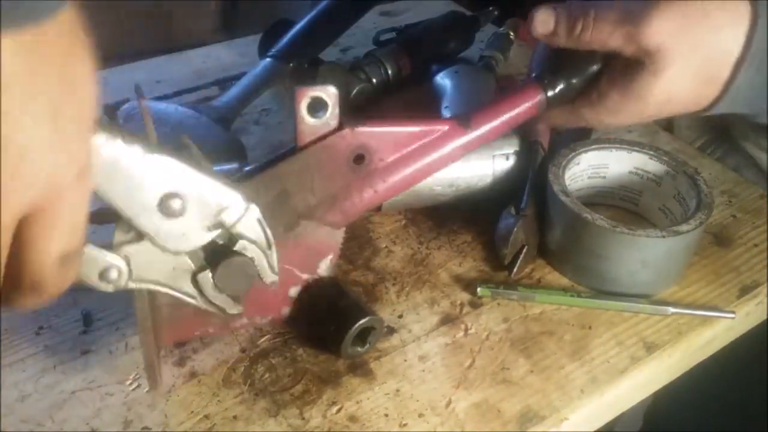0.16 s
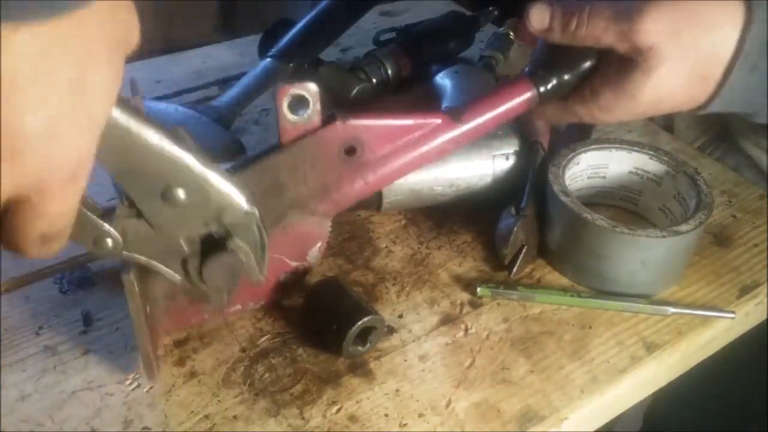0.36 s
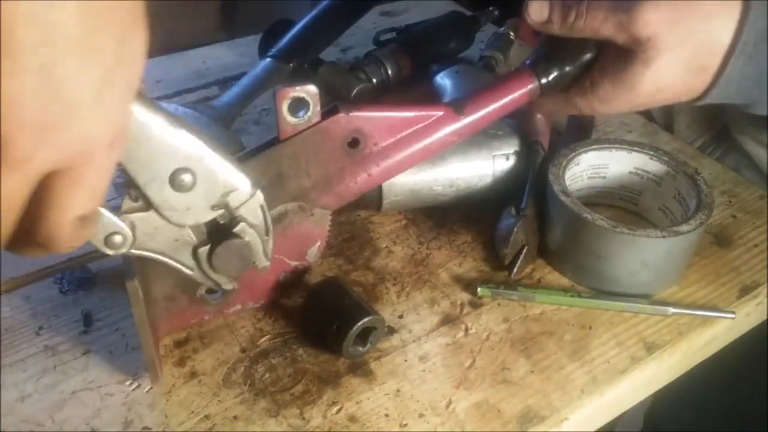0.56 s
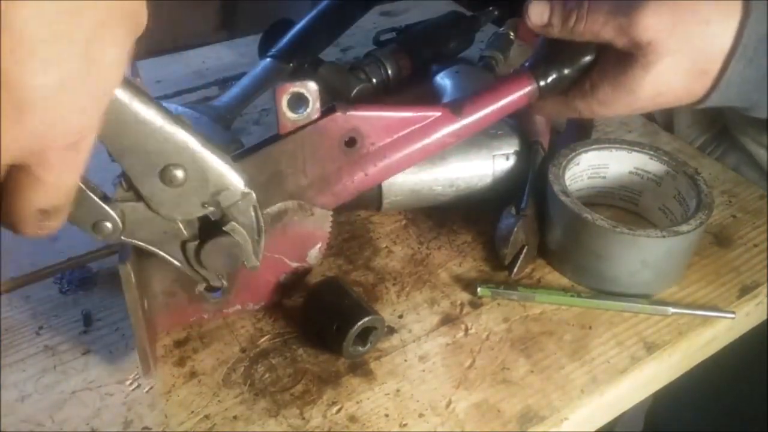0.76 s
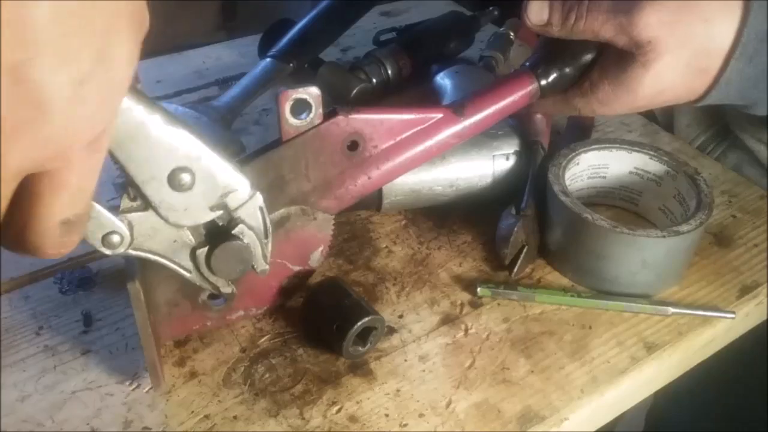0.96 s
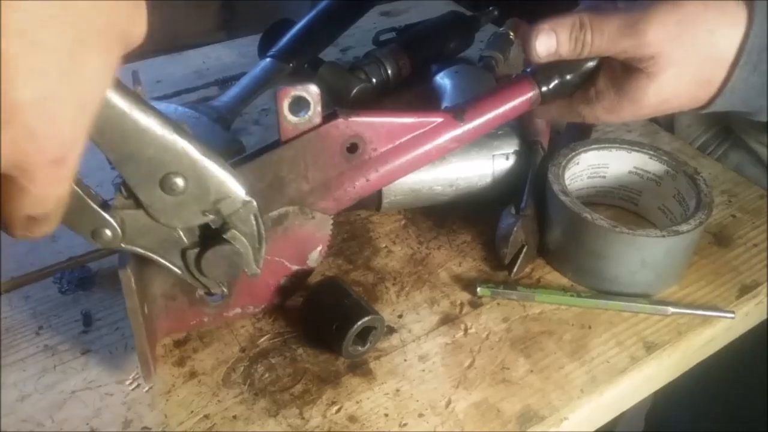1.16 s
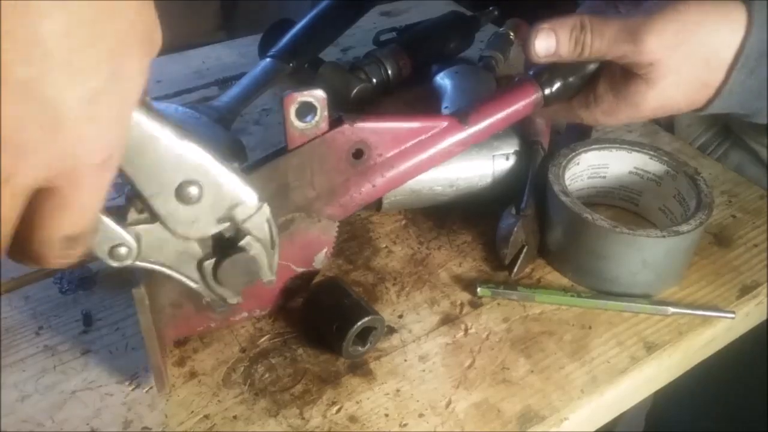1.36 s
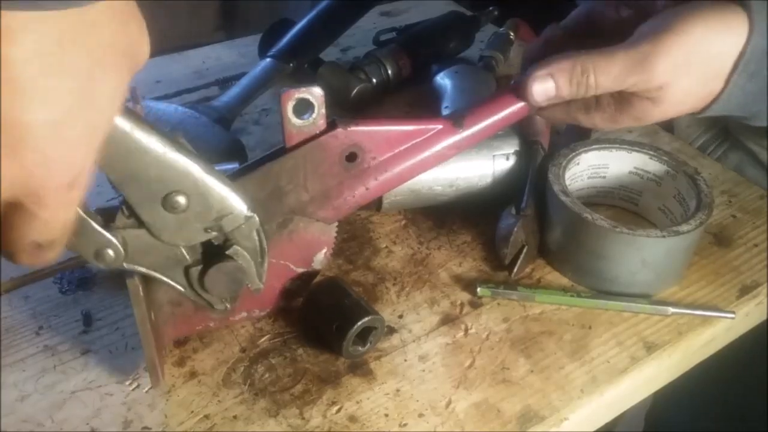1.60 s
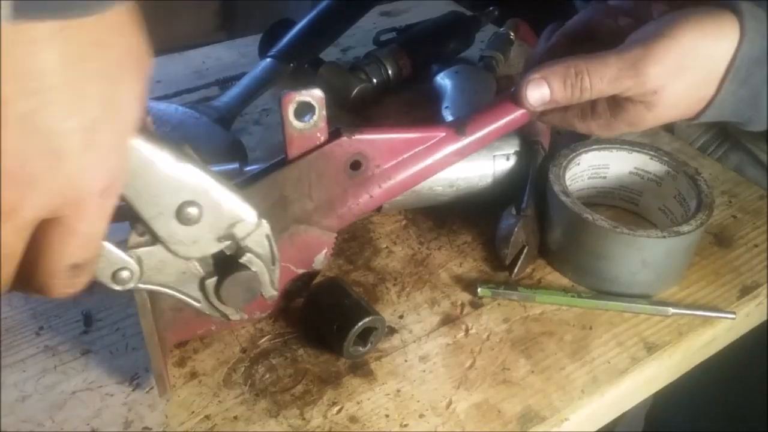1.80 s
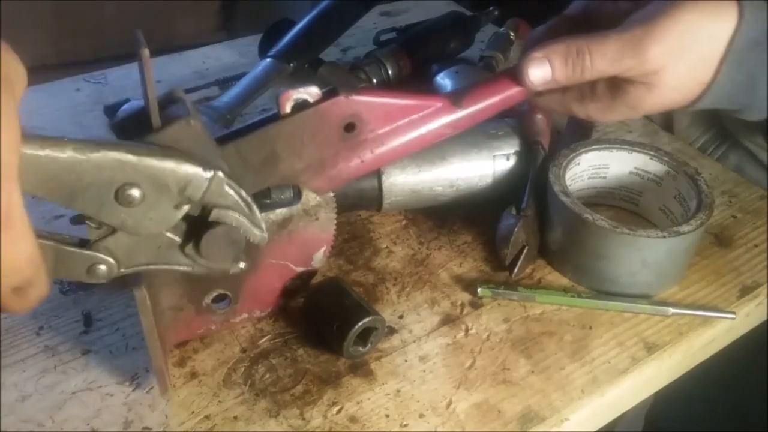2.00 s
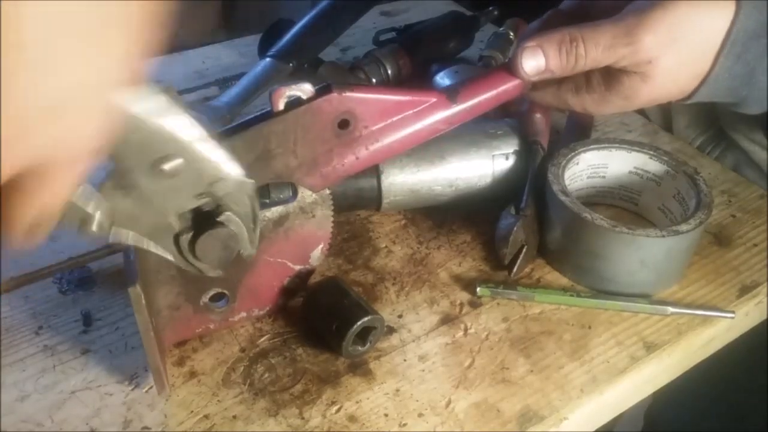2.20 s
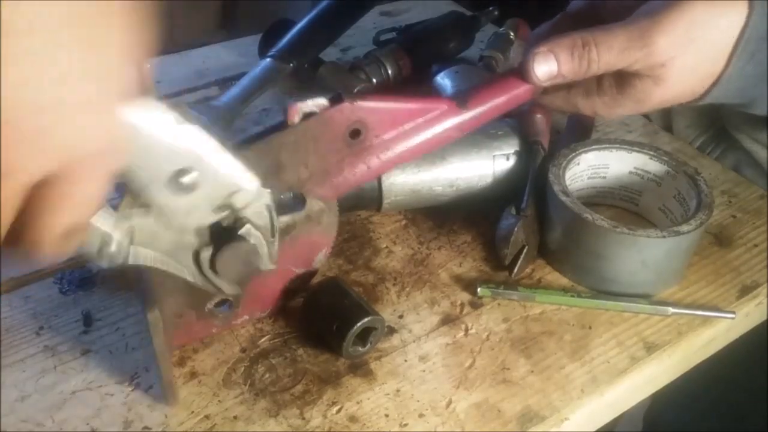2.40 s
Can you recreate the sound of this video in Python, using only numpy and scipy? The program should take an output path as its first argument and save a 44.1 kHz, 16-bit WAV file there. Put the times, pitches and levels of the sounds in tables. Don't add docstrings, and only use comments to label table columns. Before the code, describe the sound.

Metal pliers clank and scrape as they twist a stuck rusty part on a wooden workbench

```python
import sys
import numpy as np
from scipy import signal
from scipy.fft import rfft, irfft
from scipy.io import wavfile
from scipy.ndimage import uniform_filter1d, map_coordinates

SR = 44100
rng = np.random.default_rng(int(sys.argv[2]) if len(sys.argv) > 2 else 0)


def to_linear_factor(level_db):
    exponent = np.asarray(level_db, float) / 20
    return 10 ** exponent


def wav_record(signal):
    frames = np.transpose(np.atleast_2d(signal))
    bounded = np.clip(frames, -1, 1)
    quanta = np.round(bounded * 32767).astype(np.int16)
    wavfile.write(sys.argv[1], SR, quanta)


N = 108045
T = np.arange(SR // 4) / SR


def unit(x):
    return x / np.sqrt(np.mean(x ** 2) + 1e-20)


def along(points, hz):
    f, value = np.transpose(points)
    return np.interp(np.log(hz + 1), np.log(f + 1), value)


def colour(x, points):
    gain = to_linear_factor(along(points, np.fft.rfftfreq(4096, 1 / SR)))
    cepstrum = irfft(np.log(gain + 1e-6))
    cepstrum[1:2048] *= 2
    cepstrum[2049:] = 0
    return signal.fftconvolve(x, irfft(np.exp(rfft(cepstrum))))[:len(x)]


def waver(per_s, count):
    return map_coordinates(rng.standard_normal(count), [T * per_s])


def ring(modes, scatter_db, favoured_hz=1, low_db=0):
    hz, db, t60 = np.transpose(modes)[:, :, None]
    octaves_off = np.log2(hz / favoured_hz)
    db = db + low_db * (hz < 200) + scatter_db * rng.standard_normal(hz.shape)
    db = db + 9 * np.exp(-(octaves_off / 0.3) ** 2)
    return np.sum(to_linear_factor(db - 60 * T / t60) * np.sin(2 * np.pi * hz * T), axis=0)


def strays(count):
    return [(hz, 0, t60) for hz, t60 in rng.uniform([5500, .015], [11500, .045], (count, 2))]


def add(track, s, x):
    part = track[round(s * SR):][:len(x)]
    part += x[:len(part)]


# f/Hz, level/dB, t60/s
JAW_MODES = [(12110, -6, .1), (12312, -9, .07)]
PIVOT_MODES = [(13640, -8, .045)]
LEVER_MODES = [(6082, -12, .075), (4550, -22, .05)]
# f/Hz, level/dB
CRACK_COLOUR = [(300, -31), (1500, -3), (2500, 5), (5000, -3.5), (6500, 6), (9000, 10), (16500, -4.5)]


def steel_hit(jaw_db=-34.5, pivot_db=-34.5, lever_db=-34.5):
    hiss = unit(colour(rng.standard_normal(len(T)), CRACK_COLOUR))
    spike = to_linear_factor(-6.5 - 60 * T / 0.0014)
    chatter = to_linear_factor(-27 - 60 * T / 0.21)
    crack = 0.44 * hiss * (spike + to_linear_factor(-60 * T / 0.012) + chatter)
    jaw_shake, pivot_shake, lever_shake = [to_linear_factor(5 * waver(140, 40)) for part in range(3)]
    jaw = jaw_shake * to_linear_factor(jaw_db) * ring(JAW_MODES, 1)
    pivot = pivot_shake * to_linear_factor(pivot_db) * ring(PIVOT_MODES, 0)
    lever = lever_shake * to_linear_factor(lever_db) * ring(LEVER_MODES, 6)
    stray = to_linear_factor(-22) * ring(strays(count=6), 4.52)
    build_up = 1 - np.exp(-T / 0.00044)
    return crack + (jaw + pivot + lever + stray) * build_up


# t/s, crack peak level/dB, then jaw, pivot and lever ring over the crack, level/dB
CLINKS = [(0.0467, -16.5, -30, -19, -1.5), (0.2032, -37.5, 13, -12, -19), (0.211, -6.5, -5.5, 1, -8),
          (0.2932, -10.5, -13, -4, -17), (0.422, -17, -21, -8, -30), (0.4607, -5, -17, -4, -17),
          (0.5094, -13.5, -6.5, -8, -32), (0.5699, -8.5, -8.5, -10, -34), (0.597, -22.5, -9.5, -16, -29),
          (0.6814, -27, -11, -14, -32), (0.749, -27.5, -20, -21, 2.5), (0.9888, -31, -15, -22, -21),
          (1.1399, -19.5, -15, -27, -3), (1.2155, -26, -13, -30, -38), (1.3369, -17.5, -6, -10, -36),
          (1.3423, -17, -6, -19, -30), (1.5343, -15, -15, -2, -40), (1.5863, -19, -11, -26, -40),
          (1.7427, -21.5, -4.5, -15, -25), (1.7486, -19.5, -16, -16, -30), (2, -17.5, -20, -14, -35),
          (2.0642, -14, -10.5, -10, -36)]


def clinks():
    out = np.zeros(N)
    for s, db, jaw_db, pivot_db, lever_db in CLINKS:
        add(out, s, to_linear_factor(db) * steel_hit(jaw_db, pivot_db, lever_db))
    return out


# t/s, peak level/dB
TICKS = [(.001, -33), (.282, -26), (0.35, -30), (0.378, -19), (0.444, -19), (.52, -14), (.601, -17.5),
         (.606, -25), (.690, -30), (0.721, -38), (.814, -28.5), (.928, -33), (1.36, -20), (1.528, -31),
         (1.601, -46), (1.769, -30), (1.802, -31), (1.949, -27.5), (2.084, -20), (2.168, -43), (2.418, -36)]


def ticks():
    out = np.zeros(N)
    for s, db in TICKS:
        add(out, s, to_linear_factor(db) * steel_hit())
    return out


def jolts(rows, modes, crunch):
    out = np.zeros(N)
    low_hz, high_hz = modes[0][0], modes[-1][0]
    band = [(low_hz / 2, -30), (low_hz, 0), (high_hz, 0), (high_hz * 2, -30)]
    broad = colour(to_linear_factor(-60 * T / 0.006), band)
    t = T[:SR // 10]
    for s, db, contact_s, *favour in rows:
        u = t / np.clip(contact_s, .001, .03)
        force = unit(u * np.exp(-u * 2) * rng.standard_normal(len(u)))
        body = np.zeros(len(T))
        for mode in modes:
            push = abs(force @ np.exp(2j * np.pi * mode[0] * t)) / np.sqrt(len(t)) + 0.35
            body += ring([mode], 2, *favour) / push
        x = signal.fftconvolve(unit(body) + crunch * unit(broad), force)[:len(T)]
        add(out, s - .001, to_linear_factor(db) * x / np.abs(x).max())
    return out


# t/s, peak level/dB, contact/s, favoured f/Hz
KNOCKS = [(0.0101, -31, 0.0047, 1520), (0.0791, -33, 0.0047, 1380), (0.194, -31.5, 0.0064, 1410),
          (0.2061, -24.5, 0.0098, 2380), (0.2663, -30.5, 0.019, 2370), (0.3387, -23, 0.0085, 2380),
          (0.384, -32, 0.0042, 2470), (0.4213, -30.5, 0.0049, 2370), (0.461, -16.5, 0.0079, 2430),
          (0.509, -12, 0.009, 2950), (0.6553, -30, 0.0038, 2780), (0.7218, -31, 0.007, 2480),
          (0.7497, -27, 0.0046, 1740), (0.988, -46, 0.017, 2420), (1.1172, -30.5, 0.0032, 2490),
          (1.283, -33.5, 0.0052, 2460), (1.351, -28, 0.007, 2550), (1.7592, -33, 0.01, 1490),
          (1.798, -22, 0.0067, 3000), (1.939, -32.5, 0.015, 2660), (1.9657, -29.5, 0.012, 2410),
          (2.0868, -19, 0.0023, 3000)]
# f/Hz, level/dB, t60/s
TUBE_MODES = [(1566, 0.5, 0.013), (1738, -1, 0.029), (2380, 0.5, 0.05), (2550, 3.5, 0.02),
              (2942, 1.5, 0.02), (3560, -4.5, 0.012), (4276, -1, 0.017)]


def knocks():
    return jolts(KNOCKS, TUBE_MODES, crunch=0.53)


# t/s, peak level/dB, contact/s, favoured f/Hz, lowest modes level/dB
THUDS = [(.265, -39.5, 0.0071, 278, 0), (.322, -11, 0.0071, 300, 0), (.343, -16, 0.005, 260, 3),
         (.4635, -7.5, 0.0046, 790, -18), (.509, -26, 0.0061, 468, -3), (.651, -38, 0.007, 159, 0),
         (.723, -35.5, 0.011, 780, 0), (1.114, -37, 0.012, 790, -5), (1.364, -34.5, 0.01, 275, 0),
         (1.545, -42, 0.018, 357, 0), (1.801, -26, 0.008, 330, 2), (2.057, -28.5, 0.005, 360, 3),
         (2.084, -15.5, 0.0052, 775, 2), (2.147, -44, 0.017, 470, 0)]
# f/Hz, level/dB, t60/s
BENCH_MODES = [(95, 1, .09), (134, -6.5, 0.18), (177.5, 2.5, 0.075), (279, -7, 0.23), (357, -4.5, 0.14),
               (481.4, -1, 0.092), (779.3, 6.5, 0.027), (905, -15.5, 0.2)]


def thuds():
    return jolts(THUDS, BENCH_MODES, crunch=0.27)


# t/s, peak level/dB, contact/s
TAPS = [(0.425, -27, 0.01), (0.759, -29, 0.014), (0.848, -43.5, 0.009), (0.976, -46, 0.012),
        (1.242, -33, 0.01), (1.436, -36, 0.013), (1.636, -29.5, 0.011), (1.949, -40.5, 0.025),
        (2.261, -34.5, 0.01)]
# f/Hz, level/dB, t60/s
END_MODES = [(473.7, 12, 0.042), (620, -5.5, 0.1), (926.5, 12.5, 0.023), (1134, -29, 0.15)]


def taps():
    return jolts(TAPS, END_MODES, crunch=0.18)


# t/s, level/dB
GRIND_PRESSURE = [(0, -47.5), (.15, -65.5), (.27, -53.5), (.4, -41.5), (.55, -40.5), (0.782, -52.5),
                  (0.852, -64.5), (1.0, -56.5), (1.04, -80), (1.12, -55), (1.4, -57.5), (1.62, -58.5),
                  (1.7, -64), (1.778, -45.5), (1.918, -64), (1.958, -48.5), (2.12, -52.5), (2.332, -69.5)]
# f/Hz, level/dB
RUST_COLOUR = [(59, -11.5), (100, -4.5), (1910, -1), (2990, -7.5), (11400, -12.5), (12400, -12),
               (16000, -35)]


def grind():
    grains_per_s, spread_db = 4000, 2.5
    hits = rng.random(N) < grains_per_s / SR
    size_db = np.clip(spread_db * rng.exponential(size=N), 0, 10)
    grains = hits * to_linear_factor(size_db) * rng.standard_normal(N)
    clumps = map_coordinates(rng.standard_normal(N // 500 + 4), [np.arange(N) / 500])
    pressure_db = np.interp(np.arange(N) / SR, *np.transpose(GRIND_PRESSURE))
    grit = (unit(grains) + 0.66 * rng.standard_normal(N)) * to_linear_factor(2.9 * clumps + pressure_db)
    pliers = ring(JAW_MODES + PIVOT_MODES + LEVER_MODES, 0)
    body = ring(TUBE_MODES, 0) + 0.34 * pliers + 0.94 * ring(BENCH_MODES, 0)
    sung = signal.fftconvolve(grit, body / np.linalg.norm(body))[:N]
    return to_linear_factor(6) * colour(grit, RUST_COLOUR) + to_linear_factor(-3) * sung


# t/s, peak level/dB, contact/s
SKIDS = [
    (.36, -40, 0.018),
    (1.945, -40, 0.034),
]


def skids():
    return jolts(SKIDS, sorted(strays(count=10) + PIVOT_MODES), crunch=0.88)


# t/s, length/s, peak level/dB, f/Hz
SQUEAKS = [(0, .05, -50, 4000), (.005, .02, -50, 8740), (.058, .02, -50, 8740), (.345, .035, -38, 2370),
           (.362, .032, -36, 4500), (.36, .03, -37, 6230), (.352, .03, -42, 8120), (.352, .03, -42, 8930),
           (.362, .028, -35, 10500), (.36, .05, -33, 12300), (.355, .03, -35, 13550),
           (.368, .026, -29, 480), (.322, .022, -22, 760), (.421, .025, -33, 9590),
           (.423, .015, -38, 11400), (.465, .04, -25, 361), (.466, .03, -25, 495), (.749, .015, -42, 4300),
           (.926, .035, -52, 12110), (.938, .025, -56, 8330), (.938, .02, -58, 9590),
           (.988, .045, -55, 10000), (1.004, .028, -56, 7200), (1.004, .03, -58, 4070),
           (.99, .04, -54, 2420), (1.14, .022, -42, 4550), (1.935, .05, -43, 9600), (1.945, .06, -46, 7180),
           (1.955, .055, -44, 4790), (1.999, .028, -28, 13640), (1.938, .05, -40, 2970),
           (2.002, .045, -47, 4530), (2.014, .012, -44, 8330), (2.09, .04, -37, 935), (2.13, .08, -39, 455)]


def squeaks():
    rise_share, sag_hz_per_ms = .3, .9
    bend = np.clip(np.log(.5) / np.log(rise_share), .2, 2)
    out = np.zeros(N)
    for s, length_s, db, hz in SQUEAKS:
        u = np.clip(T / length_s, 0, 1)
        swell = np.sin(np.pi * u ** bend)
        shake = to_linear_factor(4 * waver(200, 60))
        tone = np.sin(2 * np.pi * (hz - sag_hz_per_ms * 500 * T) * T)
        add(out, s, to_linear_factor(db - 3 - 5 * u) * swell * shake * tone)
    return out


# t/s, peak level/dB
MORE_TICKS = [(.195, -38), (.386, -26), (.397, -30), (.417, -28), (.917, -43), (.937, -39), (.967, -46),
              (.978, -42), (1.005, -44), (1.995, -34), (2.006, -28)]


def more_ticks():
    out = np.zeros(N)
    for s, db in MORE_TICKS:
        add(out, s, to_linear_factor(db) * steel_hit())
    return out


# t/s, peak level/dB, contact/s, favoured f/Hz
NUDGES = [
    (.117, -44, .004, 2500),
    (.173, -44, .004, 1500),
    (.979, -40, .003, 4200),
    (.815, -38, .004, 2400),
]


def nudges():
    return jolts(NUDGES, TUBE_MODES, crunch=.5)


# f/Hz, t60/s
ROOM_T60 = [(200, 0.19), (12000, 0.15)]


def room(x):
    out = np.zeros(N)
    for a in range(0, N, SR // 4):
        hz, t, z = signal.stft(rng.standard_normal(SR // 2), SR, nperseg=256)
        fade = to_linear_factor(-60 * t / along(ROOM_T60, hz)[:, None])
        tail = signal.istft(z * fade, SR, nperseg=256)[1]
        echo = signal.fftconvolve(x[a:a + SR // 4], tail / np.linalg.norm(tail))
        add(out, a / SR + 0.0049, echo)
    return to_linear_factor(-12) * out


# f/Hz, level/dB
SHOP_COLOUR = [(24, -41), (40, 35), (630, -5.5), (2500, -5), (3650, -17), (16000, -5.5)]


def shop_air():
    return to_linear_factor(-57.5) * unit(colour(rng.standard_normal(N), SHOP_COLOUR))


def scene():
    work = clinks() + ticks() + knocks() + thuds() + taps()
    work = work + grind() + skids() + squeaks()
    work = work + more_ticks() + nudges()
    air = shop_air()
    return (work + room(work) + air)[None]


# t/s, length/s, weak partials level/dB
THIN_MOMENTS = [(.364, .013, -18), (.428, .014, -14), (.94, .011, -22), (1.008, .027, -26),
                (1.667, .01, -14), (2.028, .015, -18)]


def thin_out(x):
    kept_share, kept_below_hz = .28, 1100
    hz, t, z = signal.stft(x, SR, nperseg=256, noverlap=224)
    gain = np.ones(z.shape)
    for s, length_s, db in THIN_MOMENTS:
        now = (t > s) & (t < s + length_s)
        power = np.mean(abs(z[:, now]) ** 2, axis=1)
        rise = power / uniform_filter1d(power, size=7)
        weak = (rise < np.quantile(rise, 1 - kept_share)) & (hz > kept_below_hz)
        gain[np.ix_(weak, now)] = to_linear_factor(db)
    return signal.istft(z * gain, SR, nperseg=256, noverlap=224)[1][:N]


# f/Hz, level/dB
BAND_COLOUR = [(20, -44), (140, 0), (15900, 0), (16050, -40)]


def band_edges(x):
    return colour(x, BAND_COLOUR)


def low_pass(x):
    return signal.sosfilt(signal.butter(12, 17150, fs=SR, output="sos"), x)


def record(dry):
    mix = thin_out(band_edges(dry[0]))[None]
    return low_pass(mix)


dry = scene()
out = record(dry)
wav_record(out)
```